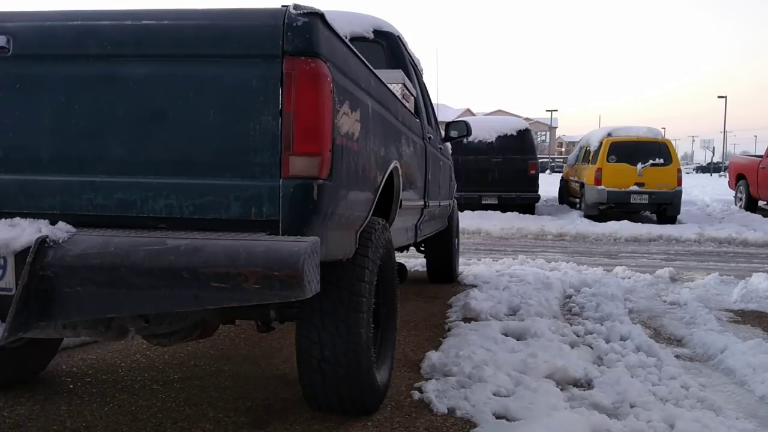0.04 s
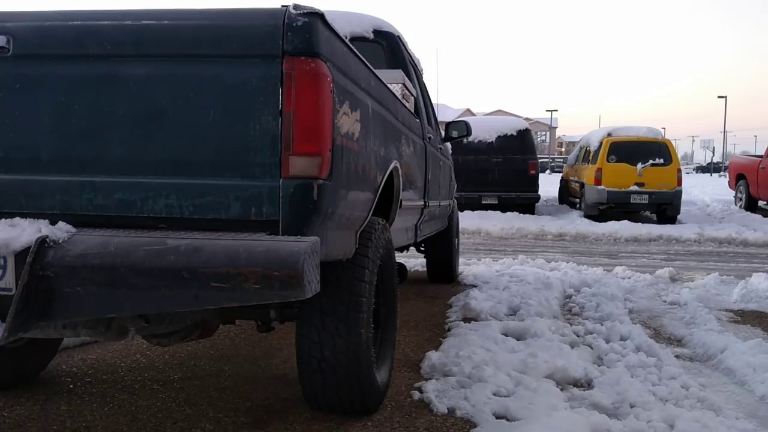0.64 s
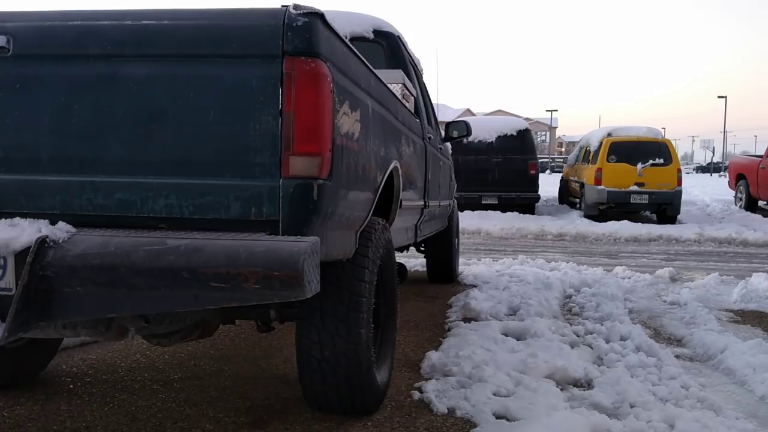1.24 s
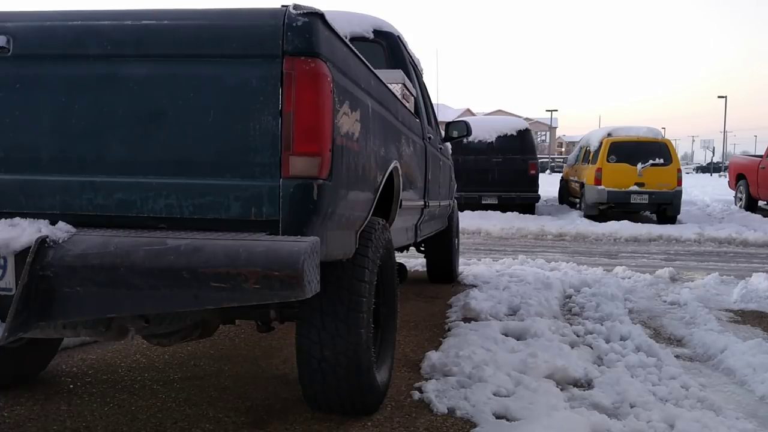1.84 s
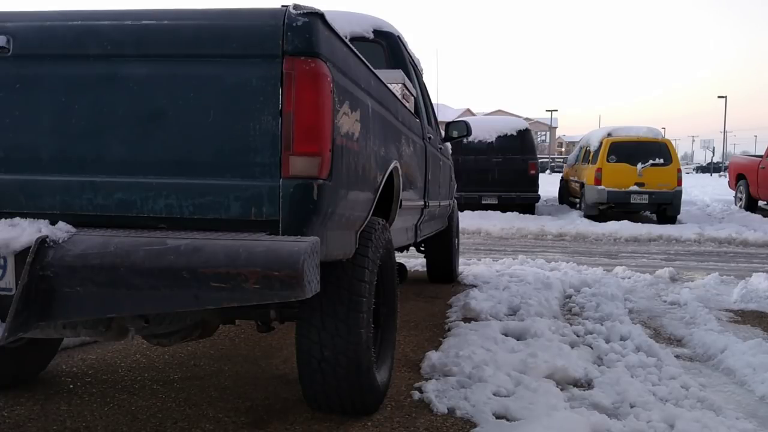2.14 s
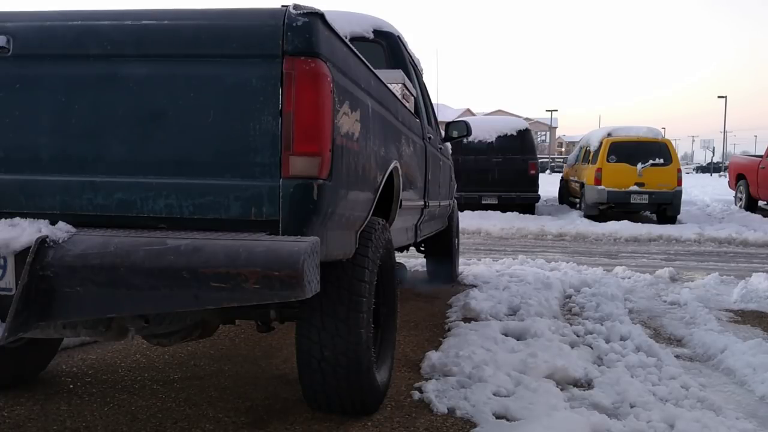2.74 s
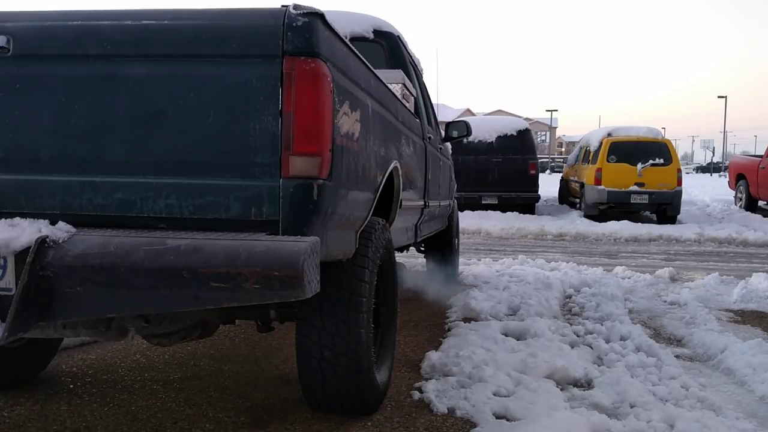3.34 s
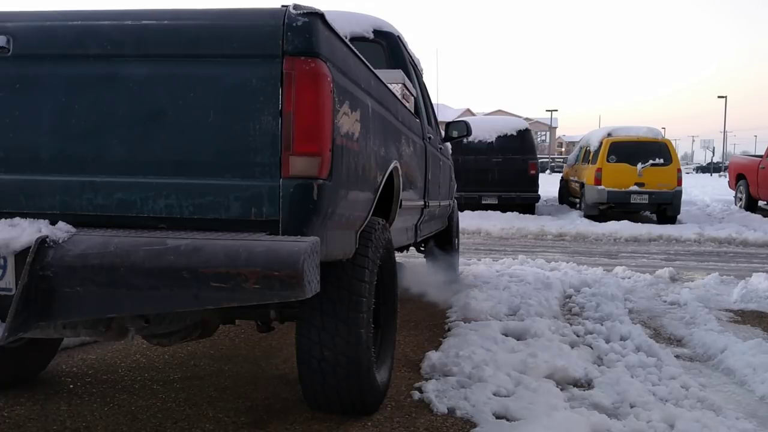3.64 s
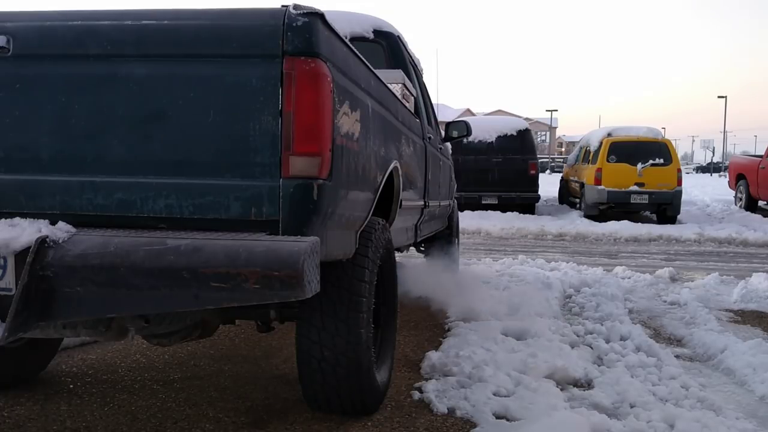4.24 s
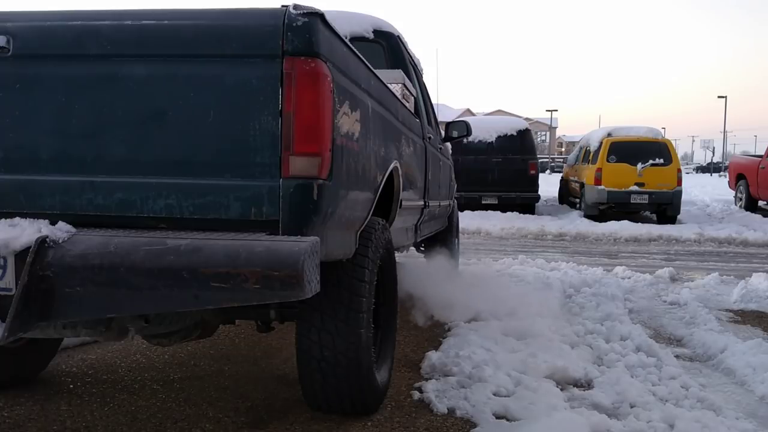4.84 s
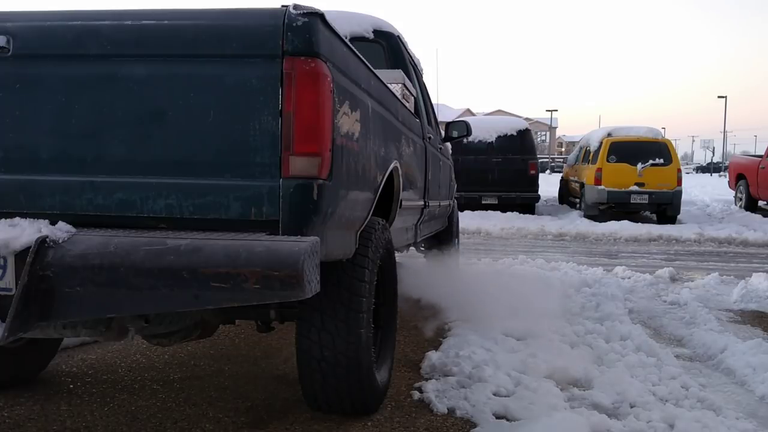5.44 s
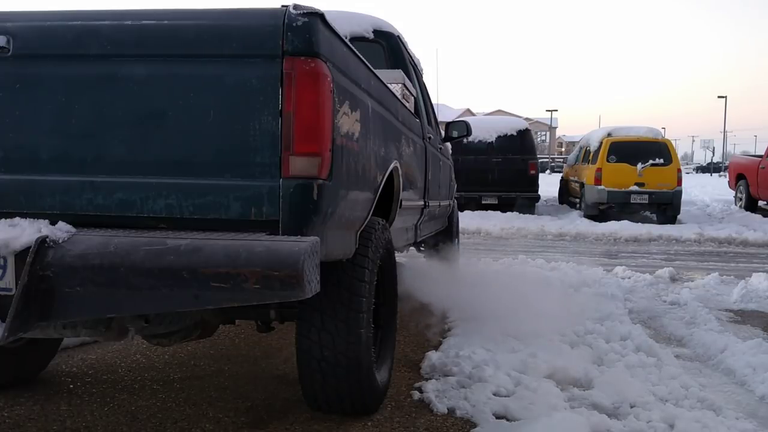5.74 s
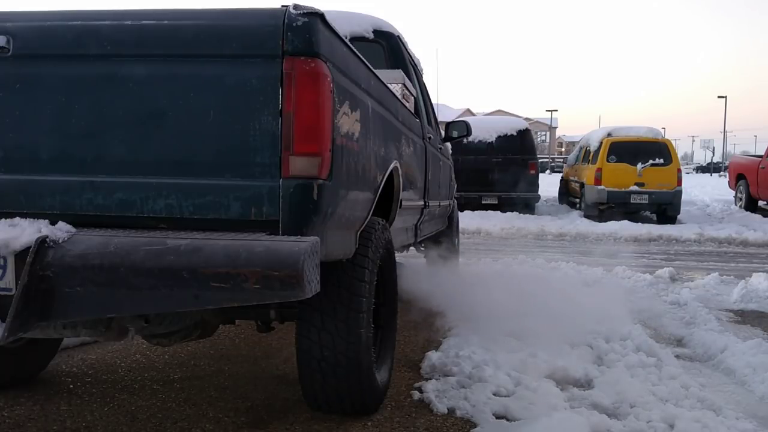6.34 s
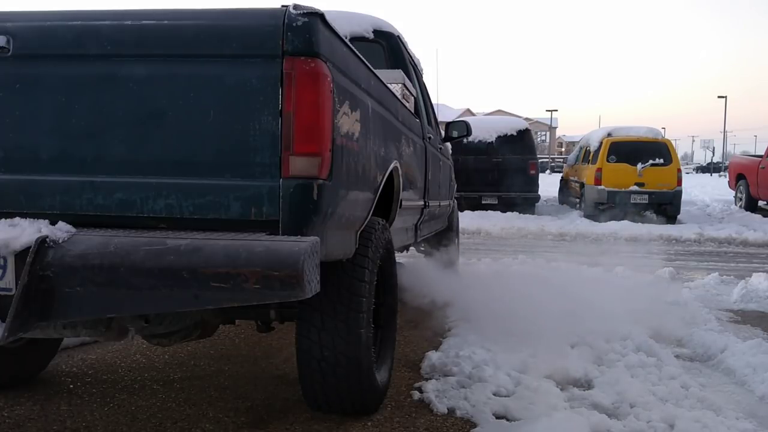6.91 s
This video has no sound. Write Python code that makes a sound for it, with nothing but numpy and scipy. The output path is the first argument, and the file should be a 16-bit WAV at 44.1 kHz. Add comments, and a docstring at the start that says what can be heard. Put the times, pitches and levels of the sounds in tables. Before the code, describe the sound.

A cold diesel pickup cranks on its starter with steady, rhythmic whining pulses, never catches, and winds down to a stop.

```python
"""A cold diesel pickup cranks in a snowy car park and does not catch, heard from behind the truck.
First the solenoid clicks and the pinion slams into the ring gear, ringing the flywheel.
Then for nearly 7 s the starter gears whine, squeal and rasp, slowed by each compression stroke,
while the block rumbles below. Last, the key is let go and the engine rocks to a stop."""
import sys
import numpy as np
from scipy import signal
from scipy.fft import rfft, irfft, next_fast_len
from scipy.io import wavfile
from scipy.ndimage import map_coordinates

SR = 44100
rng = np.random.default_rng(int(sys.argv[2]) if len(sys.argv) > 2 else 0)


def waveform_to_disk(signal):
    """Save audio, clipped to [-1, 1], as 16-bit WAV at the path in sys.argv[1]."""
    frames = np.transpose(np.atleast_2d(signal))
    scaled = np.clip(frames, -1, 1) * 32767
    samples = np.round(scaled).astype(np.int16)
    wavfile.write(sys.argv[1], SR, samples)


N = 311945
TIME_S = np.arange(N) / SR
ENGAGE_S, RELEASE_S = 0.07, 6.862

# Compression strokes. Each row: start in seconds, tooth rate in Hz at the start and at the slowest
# (both before the spin-up factor), then offsets in dB for thrum, wail at the start, wail at the
# slowest, growl, shriek, and contact as the teeth go slack.
STROKES = [(0.061, 325, 309.5, -2.0, -5.0, -2, 3.0, -2.5, 3),
           (0.205, 322.3, 228.0, 1, -0.5, 1.5, 2.5, -1.5, -0.5),
           (0.362, 348.7, 268.0, -2, 1.5, 0.0, 1.0, -2.0, -2),
           (0.495, 368.2, 278.0, -2.5, -1.0, -0.5, 1, -1, 2.0),
           (0.607, 364, 267.9, 2.5, -0.5, -2.0, 1.5, 1.5, -5),
           (0.736, 368.4, 278.4, 0.0, 1, 2.5, -3, 0.5, -2.5),
           (0.86, 367.2, 273.6, 2.5, -3, 1.0, 1.5, -1.0, -3),
           (0.974, 366, 274.1, 1.0, -2.5, 1.5, 4.5, 0, -1), (1.093, 364.6, 274.2, -0.5, 1, 3.5, 2.5, 0, -6),
           (1.213, 364, 269.8, 4.5, 1, 1.5, -4, 0, -2), (1.337, 363.5, 272.3, -1.5, -3, 1.5, -1.0, 1, -2),
           (1.462, 367.0, 280.0, -2.0, -1.0, -2.5, -0.0, -0.5, 3),
           (1.575, 357.3, 272.0, 2.5, -1.0, -2.0, 0.5, -2, -9.5),
           (1.706, 357.3, 272.0, 1, 1, -1, -1.5, -1.0, -1),
           (1.825, 365, 274.0, -0.5, -8, -0.5, -2, -1.0, -1.5),
           (1.95, 364.7, 271.8, 0, 1.5, -2.5, 2.0, -1, 0.5),
           (2.066, 360.4, 272.0, -2, -1, -2.5, -1, -1.5, -3),
           (2.194, 356.5, 268.0, 2.0, 0.5, -1.0, 1.5, 0.5, -4),
           (2.318, 363.0, 267.7, 0.0, -3, 2.0, -2.5, 0.5, -3.5),
           (2.441, 365.2, 279.3, -2, 0.5, -3.5, 1, 1, 2),
           (2.563, 357.0, 272.4, 0.5, 1, -0.5, 0.0, -1.5, -1),
           (2.687, 363.1, 275.9, -1.0, 1, -1, -1.5, -0.5, -3),
           (2.808, 364.4, 274.3, 1.0, -2, -0.5, 1.5, 1.5, 0.5),
           (2.931, 368, 271.7, 2, 2.5, 0, -1.5, 2, -1.5), (3.05, 361.0, 267.5, -2, 4.5, -3, 0, -1.5, 0),
           (3.173, 361.0, 271.8, 3, 4, -3.5, -6, 0, 0), (3.299, 367.2, 273.6, 0.5, -2.0, 2.5, 3.5, -1, -2),
           (3.418, 365, 284.0, -1.0, -1, -3, -4, 2, 2.5), (3.539, 357.6, 272.0, 4, 0, -4.5, 0, -1, -2),
           (3.659, 365.5, 271.8, -2.5, 2, -3.5, -3, 1, -1), (3.786, 365.0, 274.0, 3, -2.0, -0.5, 0, 0, -1),
           (3.903, 366.7, 273.8, 2.5, 0.5, 0, 1.5, 0.5, -2),
           (4.029, 368.6, 309.7, 1, 2.0, -11.0, -1.0, 1, 4), (4.133, 349, 253.0, 1, 5, 3.5, -3, -1.5, -2.5),
           (4.272, 352, 272.0, 0, 1, -5, 1.5, 0, -3.5), (4.396, 366, 281.8, 2, 4, -0.5, 1, 0.5, 1),
           (4.513, 360, 268.0, 0, 0.0, -1.5, 2, -4, -1.5), (4.637, 364.7, 272.0, -2.5, 3, 0, -2, -1.0, -3),
           (4.759, 369.5, 273.9, 1, 1, 0.5, 1.5, 0.5, 0.5),
           (4.879, 366.4, 273.4, -0.5, 1.5, 0, 1.0, -1, -2.0),
           (5.002, 363.0, 270.2, -1, 2.0, 0.5, -0.5, -1, -6),
           (5.122, 361.0, 272.0, 2.5, 3, -3, -3, 1, -2.0),
           (5.246, 361.6, 269.5, -0.5, -2, -1.0, 2.5, 0, -3.0),
           (5.371, 368, 282.4, -0.5, 1, 2.5, 1.5, 1, -0.5),
           (5.491, 357.0, 268.3, -1.0, 1, -0.5, 3.5, 1, -7), (5.613, 363.8, 274.4, 0.5, 2, -1, -3, 1, 0),
           (5.733, 367.8, 273.6, -2, -4, -1.5, -0.5, -3, 0),
           (5.858, 366.8, 274.3, -1, 0.0, -0.5, 1.5, 2, -2),
           (5.978, 357.7, 271.5, -0.0, 3, 2.0, 3.5, 1.0, -5.5), (6.1, 362, 267.9, 1.5, 2, 0, -0.5, -1, -5),
           (6.223, 363.6, 270.0, 0.0, -0.5, -1.5, -1, -0.5, -1),
           (6.349, 364.7, 277.6, -3, 3, -1, 1.5, 1.5, 1.5),
           (6.469, 356.2, 272.0, -1, 0, -0.5, -0.0, -1, -6),
           (6.593, 361.0, 273, 1.5, 3, 1.0, -2.0, -0.5, -3),
           (6.718, 363.0, 272.0, 1.5, 1, -1.5, -3, 0.5, 0.5),
           (6.836, 362, 280.7, 0.5, 3, -7, 2.5, -4, -8.0), (6.98, 260.0, 199.8, -3.0, 4, 4, 0.0, -5, -6.0)]

# Gear tones. Each row: multiple of the tooth rate, relative level in dB, dB per unit load.
RING_GEAR_TONES = [(3, -37, -3), (4, -41, 11.5), (5, -50, 3), (6, -52, -5)]
REDUCTION_GEAR_TONES = [(2.6, -49.5, -16), (3.69, -41.5, 10), (7.5, -41.5, 5), (11.0, -43.5, 10.5),
                        (13.94, -59, -5), (14.8, -46, -6)]
SHRIEK_TONES = [(17.6, -48, 19), (18.35, -42.5, 12), (19.2, -53.5, 24)]

# Resonances of bell housing and underbody, starter case, valve gear and tooth tips.
# Each row: frequency in Hz, width in Hz, relative gain in dB.
HOUSING_MODES = [(301, 26, -3.5), (351.6, 13, 0.5), (375, 8.3, 1.5), (554.3, 19.4, 6), (675, 21, 2.5),
                 (719.6, 10, 0.5), (845, 21, -2.5), (881, 24, 1), (985, 25, 3), (1078, 12, 1.5),
                 (1237, 21, -4.5), (1413, 15, -5), (1454, 18.7, 6.5), (1570, 13, -13), (1728, 7.5, 7),
                 (2848, 23, 2)]
CASE_MODES = [(4950, 95, 5.5), (5410, 42, -11), (5680, 37, -5), (5950, 42, 0), (6150, 50, 8)]
RATTLE_MODES = [(2634, 89, 0.5), (3095, 73, 1.5), (3510, 63, 1.5), (3970, 65, 1.5), (5600, 890, -7),
                (7730, 300, -9), (9400, 980, -13.5)]
# Flywheel ring. Each row: frequency in Hz, relative level in dB, t60 in seconds.
FLYWHEEL_MODES = [(384, -4.5, 0.22), (566, -4, 0.14), (653, 3, 0.13), (728, -10, .06), (880, 8, 0.087),
                  (1180, -6, 0.1), (1374, -7, 0.076), (1763, -6, 0.1)]

# Pinion strikes as it seats; dull block thumps. Each row: time in seconds, relative level in dB.
PINION_CLASHES = [(0.069, -35), (.079, -18), (.084, -21), (.094, -21), (.166, -25), (.236, -35)]
BLOCK_THUMPS = [(1.6, -51), (2.58, -54), (3.35, -59), (3.85, -65)]

# Source spectra. Each row: frequency in Hz, relative spectral density in dB.
BRUSH_SPECTRUM = [(900, -6), (1700, 1.5), (2800, -1.5), (4000, -2.5), (5300, -5.5), (7000, -9),
                  (10000, -12), (14000, -12)]
SCRAPE_SPECTRUM = [(150, -36), (230, -14), (310, -4), (420, -3), (620, 2), (1000, 1), (1350, -2),
                   (1900, -5), (3000, -5), (4000, -8.5), (4500, -5.5), (5000, -7.5), (6000, -5.5),
                   (6900, -12), (7800, -10), (10300, -10), (11200, -11.5), (12300, -13), (14000, -25)]
CLICK_SPECTRUM = [(100, -17), (500, -16), (1200, 0), (2200, -2), (3800, 3), (6000, -2), (9000, -6),
                  (14000, -15)]
SLAM_SPECTRUM = [(40, -40), (110, -25), (200, -17), (380, -4), (650, 9.5), (900, 0), (1500, -2), (2000, -3),
                 (2600, -8.5), (6000, -10), (9000, -12), (14000, -19)]
SHUDDER_SPECTRUM = [(30, -25), (60, -12), (90, 0), (130, 1), (190, -10), (300, -2), (800, -42)]
RUMBLE_SPECTRUM = [(20, -30), (40, -21), (65, 0.5), (80, -7), (125, 1.5), (165, -8.5), (260, -1),
                   (500, -28), (1500, -70)]
AIR_SPECTRUM = [(20, -18), (70, -11), (180, -13), (500, 10), (1000, -7), (2000, -23), (6000, -26),
                (14000, -47)]
REBOUND_SPECTRUM = [(100, -27), (270, -26), (360, 9), (480, -8), (800, 4), (1500, -12), (5000, -21),
                    (14000, -57)]

# Echo decay between chassis and ground. Each row: frequency in Hz, t60 in seconds.
UNDERBODY_DECAY = [(150, 0.19), (700, 0.14), (3000, 0.1), (12000, 0.17)]
# Left-right correlation. Each row: frequency in Hz, mean, depth of its ripple over frequency.
CORRELATION = [(100, 0.43, 0.015), (180, 0.26, 0.2), (302, 0.93, 0), (454, 0.31, 0), (580, 0.88, 0),
               (1170, 0.94, 0.08), (1450, 0.65, 0.43), (1986, 0.21, 0.23), (2290, 0.018, 1),
               (2760, 0.1, 0.31), (3800, 0.76, 0.055), (4490, 0.02, 1), (6940, 0.19, 0.24),
               (13000, 0.23, 0.83)]
# Channel balance. Each row: frequency in Hz, left over right in dB.
BALANCE = [(60, -1.5), (92, -8.5), (140, 4.5), (210, -9.5), (330, 4.5), (500, -2.5), (760, 0.5),
           (1160, -0.5), (1770, 4), (2690, -1), (4110, 0.5), (6270, -2), (9570, 1.5), (14600, 0)]


def starter(teeth, load, contact_db, thrum_db, wail_db, growl_db, shriek_db):
    """Gear tones, squeal, rattle and tooth scrapes, echoing under the truck and ringing the housing."""
    drive = effort(attack_s=0.06, release_s=0.24, coast_db=-38) * amp(contact_db)
    thrum = amp(thrum_db) * whine([(1, -40.5, 12)], teeth, load, slip_teeth=0.054, flutter_db=3, hz=100)
    wail = amp(wail_db) * whine([(2, -34, 1)], teeth, load, slip_teeth=0.024, flutter_db=2.4, hz=120)
    growl = amp(growl_db) * whine(RING_GEAR_TONES, teeth, load, slip_teeth=0.029, flutter_db=3.5, hz=100)
    ring_gear = echoes(drive * (thrum + wail + growl), wet=0.039)

    shriek = amp(shriek_db) * whine(SHRIEK_TONES, teeth, load, slip_teeth=0.006, flutter_db=3.5, hz=300)
    reduction = whine(REDUCTION_GEAR_TONES, teeth, load, slip_teeth=0.008, flutter_db=5, hz=260)
    armature = reduction + shriek + squeal(teeth, load)
    motor = echoes(ringing(drive * armature, CASE_MODES) + drive * rattle(load), wet=0.36)
    motor += drive * ping(teeth, load)

    scrape_drive = effort(attack_s=0.11, release_s=0.16, coast_db=-26.5) * amp(0.1 * contact_db)
    scrapes = scrape_drive * rasp(teeth, load)
    return amp(-2.5) * ringing(ring_gear + motor + scrapes, HOUSING_MODES)


def crank(slowest_at=0.54, press_at=0.26, slack_at=0.685, spin_up_s=0.05):
    """Each compression slows the starter and loads its teeth. Returns teeth passed, load, dB curves."""
    start_s, top_hz, slow_hz, thrum, wail_top, wail_slow, growl, shriek, slack = np.transpose(STROKES)
    index = np.arange(len(start_s))
    strokes = np.interp(TIME_S, start_s, index)
    share = strokes % 1  # positions (at) and widths are shares of a stroke
    swing_phase = np.interp(share, [0, slowest_at, 0.78, 1], [0, 0.5, 0.81, 1])
    squeeze = np.sin(np.pi * swing_phase) ** 2

    def per_stroke(column, at):
        return np.interp(strokes, index + at, column)

    def around(at, width):
        return bump((share - at + 0.5) % 1 - 0.5, width)

    def swing(top, slow):
        return per_stroke(top, 0) * (1 - squeeze) + per_stroke(slow, slowest_at) * squeeze

    spin_up = 1 - 0.4 * np.exp(-np.maximum(TIME_S - ENGAGE_S, 0) / spin_up_s)
    teeth = np.cumsum(spin_up * swing(top_hz, slow_hz)) / SR
    load = 0.38 * around(press_at, 0.16) - 0.37 * around(0.83, 0.096)  # eases as the piston springs on
    contact_db = 0.66 + per_stroke(slack, slack_at) * around(slack_at, 0.17)
    thrum_db = per_stroke(thrum, press_at) - 4.5 * around(0.69, 0.067)  # ring gear outruns the pinion
    labour_db = 4.5 * squeeze ** 2 - 4 * around(0.76, 0.1)  # up at the slowest, down as speed returns
    wail_db = swing(wail_top, wail_slow) + labour_db
    growl_db = per_stroke(growl, press_at)
    shriek_db = per_stroke(shriek, press_at) + 11 * bump(TIME_S - 0.195, 0.04)  # dry gears reach speed
    return teeth, load, contact_db, thrum_db, wail_db, growl_db, shriek_db


def effort(attack_s, release_s, coast_db):
    """The starter takes hold, pulls evenly and fades toward coasting once the key is let go."""
    attack = 1 - np.exp(-np.maximum(TIME_S - ENGAGE_S, 0) / attack_s)
    released = 1 - np.exp(-np.maximum(TIME_S - RELEASE_S, 0) / release_s)
    return attack * amp(coast_db * released)


def whine(tones, teeth, load, slip_teeth, flutter_db, hz):
    """Tones on multiples of the tooth rate; backlash shakes their phase and level at rate hz."""
    phase = 2 * np.pi * (teeth + slip_teeth * wobble(hz))
    total = np.zeros(N)
    for order, db, load_db in tones:
        tone = amp(flutter_db * wobble(hz)) * np.sin(order * phase)
        total += amp(db + load_db * load) * unit(tone)
    return total


def squeal(teeth, load, turns_per_tooth=0.41, slip_teeth=0.0047, flutter_db=2.5, bins=110, size=4096):
    """Brushes and bearings rub the same bumps every armature turn: a dense comb of gliding tones."""
    harmonics = np.exp(2j * np.pi * rng.random(bins)) * (np.arange(bins) > 0)
    bumps = irfft(harmonics, size)
    turns = turns_per_tooth * (teeth + slip_teeth * wobble(120))
    rub = np.interp(turns % 1, np.arange(size) / size, bumps)
    return amp(-38 - 4.5 * load + flutter_db * wobble(70)) * coloured(rub, BRUSH_SPECTRUM)


def rasp(teeth, load, bite_db=4.5, scatter_db=0.97, split_hz=1500):
    """Each tooth lands with a scrape of its own strength; load makes it louder and brighter."""
    tooth_db = scatter_db * rng.standard_normal(N)[teeth.astype(int)]
    envelope = amp(tooth_db - bite_db * (teeth % 1))
    scrapes = coloured(rng.standard_normal(N) * envelope, SCRAPE_SPECTRUM)
    dull = filtered(scrapes, lambda hz: 1 / (1 + (hz / split_hz) ** 4))
    bright = scrapes - dull
    return amp(-28.5) * (dull * amp(2 * load) + bright * amp(5 * load))


def ping(teeth, load, order=8.58, mode_hz=3105, width_hz=52):
    """Near full speed one gear tone reaches a sharp resonance of the case."""
    tone = amp(-24 * load + 3.5 * wobble(8)) * np.sin(2 * np.pi * order * teeth)
    return amp(-33) * filtered(tone, lambda hz: resonance(hz, mode_hz, width_hz))


def rattle(load, ticks_per_s=240, scatter_db=6, load_db=9):
    """Valve gear and tooth tips tick at random, harder under load."""
    def metal(hz):
        return sum((-1) ** k * amp(db) * resonance(hz, mode_hz, width_hz)
                   for k, (mode_hz, width_hz, db) in enumerate(RATTLE_MODES))

    hits = rng.random(N) < ticks_per_s / SR
    ticks = hits * amp(scatter_db * rng.uniform(-1.2, 1, N) + load_db * load)
    return amp(-39.5) * unit(filtered(ticks, metal))


def engage():
    """The solenoid clicks, the pinion slams home and the block shudders on its mounts."""
    click = amp(-27) * burst(0.039, rise_s=0.0078, t60_s=0.14) * noise(CLICK_SPECTRUM)
    slam = amp(-16) * burst(0.081, rise_s=0.079, t60_s=0.15) * noise(SLAM_SPECTRUM)
    shudder = amp(-38) * burst(0.116, rise_s=0.2, t60_s=0.67) * noise(SHUDDER_SPECTRUM)
    return click + slam + shudder + amp(-4.5) * flywheel()


def flywheel(attack_s=0.0007, scatter_db=2.5):
    """The pinion chatters on the ring gear as it seats; each strike rings the flywheel."""
    ring = np.zeros(N)
    t = np.arange(SR // 2) / SR
    attack = 1 - np.exp(-t / attack_s)
    for start_s, clash_db in PINION_CLASHES:
        first = round(start_s * SR)
        for hz, mode_db, t60_s in FLYWHEEL_MODES:
            decay = amp(clash_db + mode_db + rng.normal(0, scatter_db) - 60 * t / t60_s)
            ring[first:first + len(t)] += attack * decay * np.cos(2 * np.pi * hz * t)
    return ring


def block(load):
    """The turning engine rumbles and thumps, then rocks and rebounds as the starter lets go."""
    turning = amp(-53.5 + 2 * load) * np.interp(TIME_S, [0.06, 0.12], [0, 1])
    thumps = sum(amp(db) * burst(peak_s, rise_s=0.06, t60_s=0.15) for peak_s, db in BLOCK_THUMPS)
    rock = amp(-54) * burst(6.89, rise_s=0.24, t60_s=0.49)
    rumble = (turning + thumps + rock) * noise(RUMBLE_SPECTRUM)
    rebound = amp(-35) * burst(6.98, rise_s=0.28, t60_s=0.45) * noise(REBOUND_SPECTRUM)
    return rumble + rebound


def ringing(x, modes):
    """Metal rings at fixed pitches as the tones sweep past."""
    def response(hz):
        peaks = [1 + amp(db) * resonance(hz, mode_hz, width_hz) for mode_hz, width_hz, db in modes]
        return np.prod(peaks, axis=0)

    return filtered(x, response)


def echoes(x, wet):
    """A share wet of the power scatters between chassis and ground."""
    hz, t, bands = signal.stft(rng.standard_normal(SR // 4), SR, nperseg=256)
    t60_s = along(UNDERBODY_DECAY, hz)[:, None]
    tail = signal.istft(bands * amp(-60 * t / t60_s) / np.sqrt(t60_s), SR, nperseg=256)[1]
    scattered = signal.oaconvolve(x, tail / np.linalg.norm(tail))[:N]
    return np.sqrt(1 - wet) * x + np.sqrt(wet) * scattered


def air():
    """Faint steady air of the car park."""
    return amp(-44) * noise(AIR_SPECTRUM)


def stereo(common, apart, ripple_hz=2215):
    """Mid and side to left and right; treble bands lie in and out of phase by turns."""
    points = np.array(CORRELATION)
    mean, depth = points[:, [0, 1]], points[:, [0, 2]]

    def angle(hz):
        correlation = along(mean, hz) - along(depth, hz) * np.cos(2 * np.pi * hz / ripple_hz)
        return np.arccos(np.clip(correlation, -0.99, 0.99)) / 2

    mid = filtered(common, lambda hz: np.cos(angle(hz)))
    side = filtered(apart, lambda hz: 1j * np.sin(angle(hz)))
    return np.array([mid + side, mid - side])


def amp(db):
    """Decibels to gain."""
    return np.exp(np.asarray(db) * (np.log(10) / 20))


def unit(x):
    """Scale to rms 1."""
    return x / np.sqrt(np.mean(x ** 2) + 1e-20)


def along(points, hz):
    """(Hz, value) points read on a log axis."""
    point_hz, values = np.transpose(points)
    return np.interp(np.log(hz + 1), np.log(point_hz + 1), values)


def bump(x, width):
    """Bell of height 1 around x = 0."""
    return np.exp(-(x / width) ** 2)


def burst(peak_s, rise_s, t60_s):
    """Envelope: up 60 dB in rise_s to its peak, down 60 dB in t60_s."""
    return amp(-60 * np.maximum((peak_s - TIME_S) / rise_s, (TIME_S - peak_s) / t60_s))


def wobble(rate_hz):
    """Smooth random curve, rate_hz knots a second."""
    grid = np.arange(0, N * rate_hz / SR + 1, 0.125)
    knots = rng.standard_normal(int(grid[-1]) + 4)
    return np.interp(TIME_S * rate_hz, grid, map_coordinates(knots, [grid]))


def resonance(hz, mode_hz, width_hz):
    """Band-pass response of one mode."""
    return 1j * hz * width_hz / (mode_hz ** 2 - hz ** 2 + 1j * hz * width_hz)


def filtered(x, response):
    """x through a complex frequency response."""
    size = next_fast_len(N + SR // 2)
    hz = np.fft.rfftfreq(size, 1 / SR)
    return irfft(rfft(x, size) * response(hz), size)[..., :N]


def coloured(x, spectrum):
    """x shaped by a spectrum, at rms 1."""
    return unit(filtered(x, lambda hz: amp(along(spectrum, hz))))


def noise(spectrum):
    """Coloured noise of rms 1."""
    return coloured(rng.standard_normal(N), spectrum)


def scene():
    """Starter and engine over faint air; mid and side share one crank motion."""
    teeth, load, *levels_db = crank()
    common, apart = (starter(teeth, load, *levels_db) + engage() + block(load) + air() for _ in range(2))
    channels = stereo(common, apart)
    return filtered(channels, lambda hz: amp(np.outer([0.5, -0.5], along(BALANCE, hz))))


def record(dry, top_hz=14300):
    """Brick-wall low-pass."""
    return filtered(dry, lambda hz: hz < top_hz)


dry = scene()
out = record(dry)
waveform_to_disk(out)
```